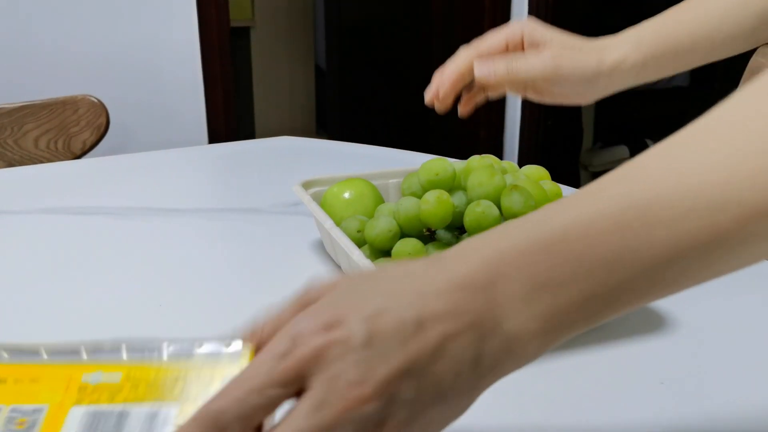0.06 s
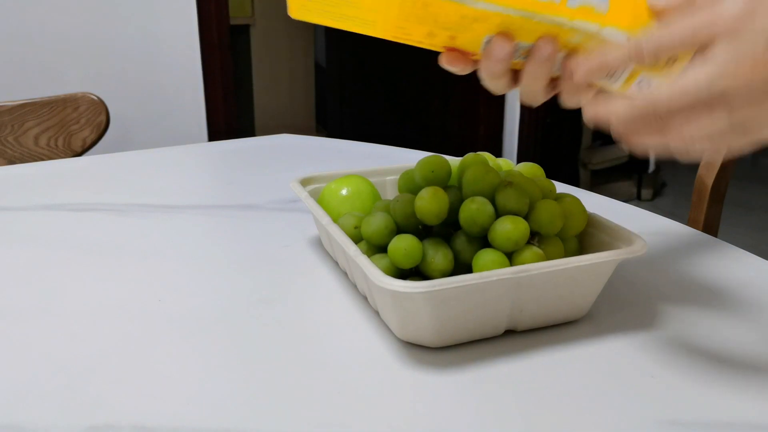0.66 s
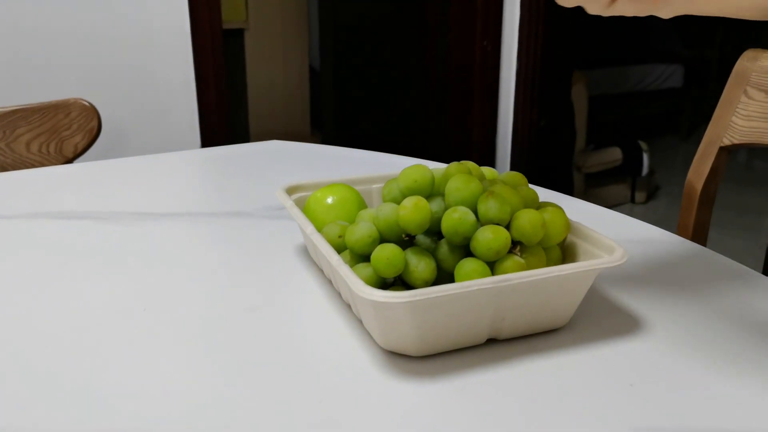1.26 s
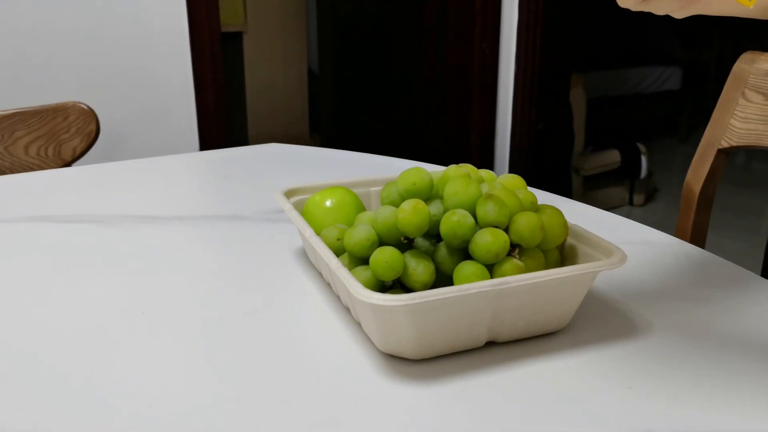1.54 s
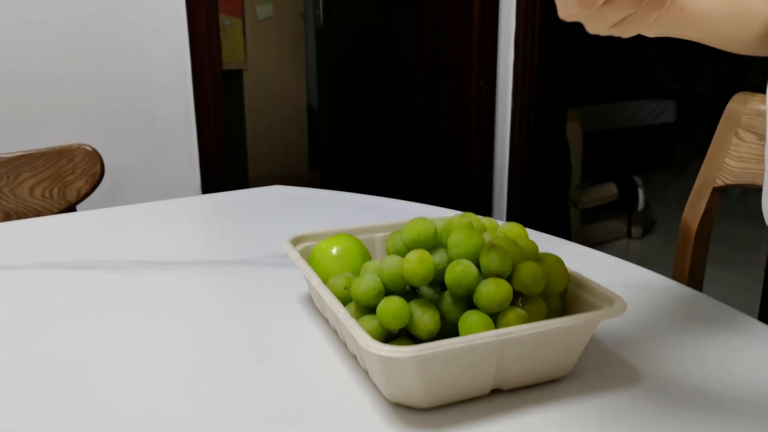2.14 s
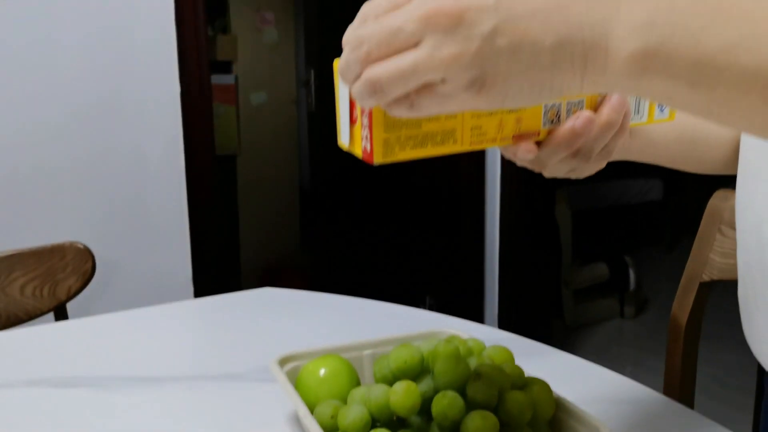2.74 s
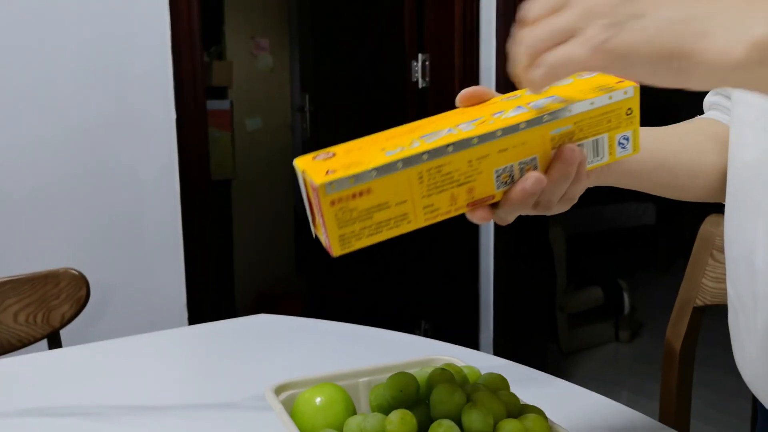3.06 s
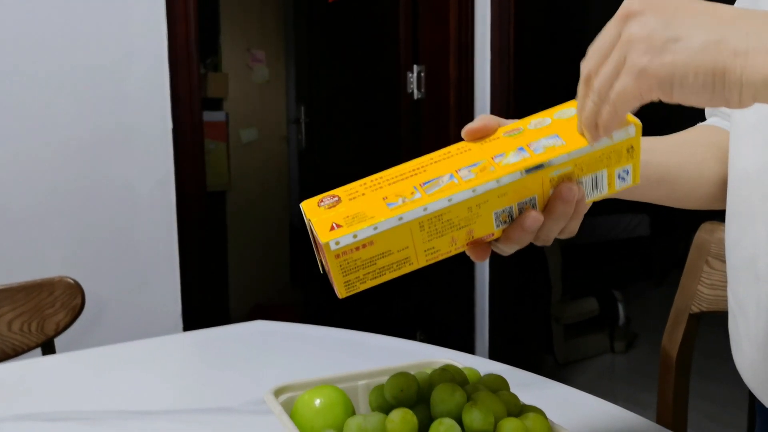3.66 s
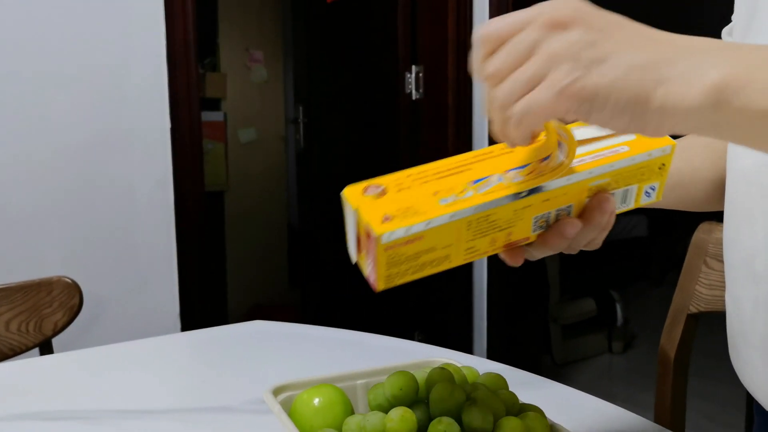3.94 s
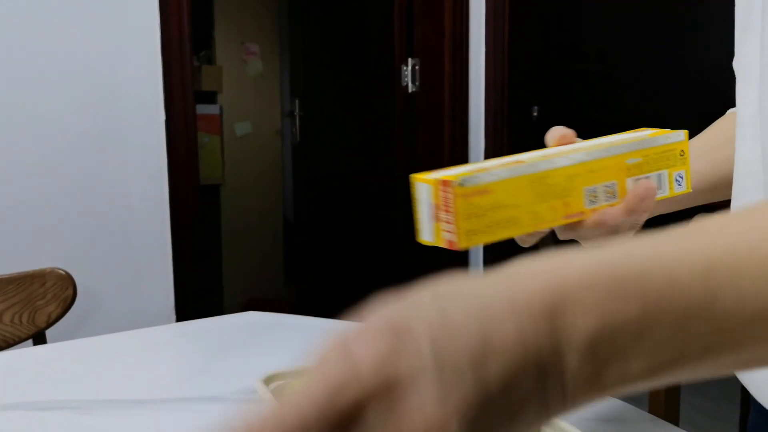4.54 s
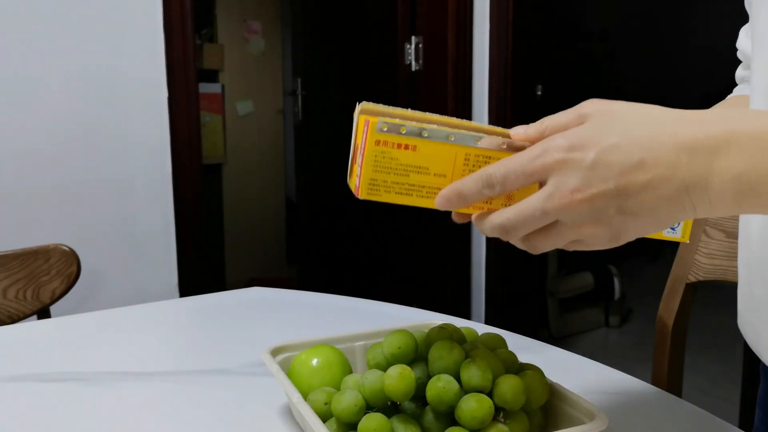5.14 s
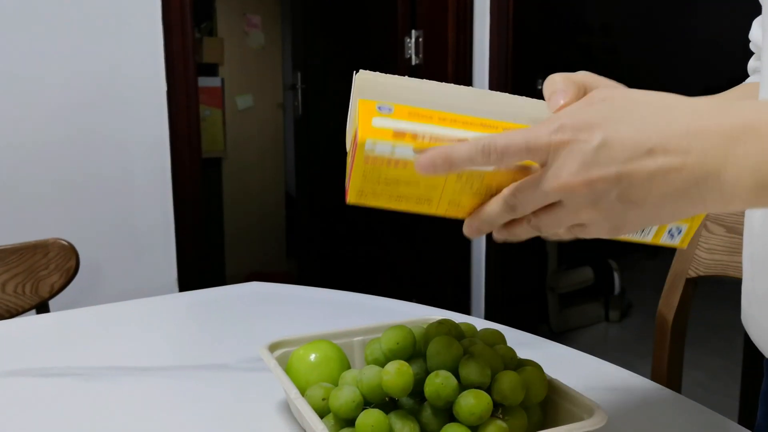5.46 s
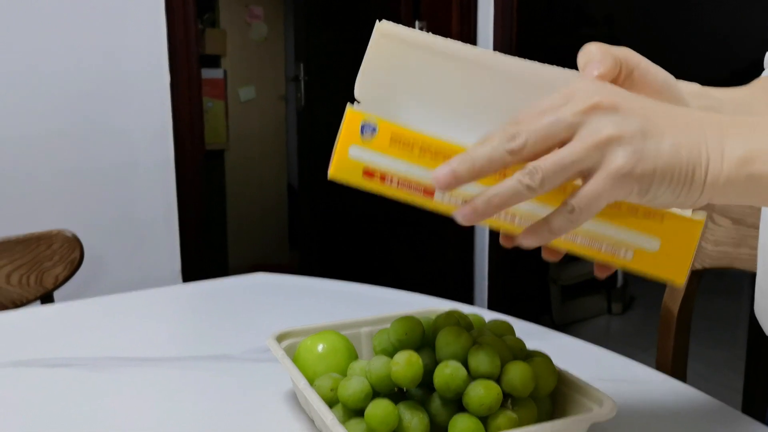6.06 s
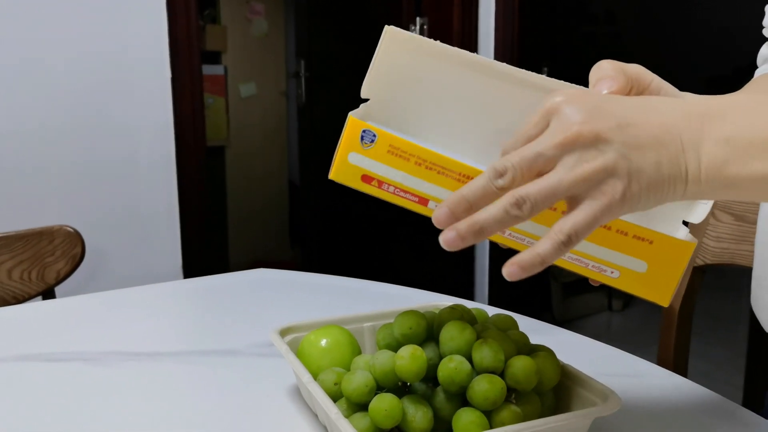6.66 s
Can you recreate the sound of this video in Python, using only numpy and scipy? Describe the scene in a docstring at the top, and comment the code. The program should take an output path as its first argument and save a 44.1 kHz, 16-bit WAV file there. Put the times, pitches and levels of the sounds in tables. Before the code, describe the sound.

A cardboard box of cling film knocks hollowly on a table as it is picked up. Fingers slide and scrape over the card with a faint squeak. After a lull and a few snaps, the perforated strip rips off in one long crackling pull and comes free with a thud. The lid bends open with snaps and scrapes, and the film crinkles lightly. It is all close to a phone in a small, faintly droning room.

```python
"""A carton of cling film is picked up and opened, close to a phone in a small, faintly droning room.
First it knocks on the table; then hands slide and scrape over the card and a finger sings along an edge.
From 3.6 s the perforated strip rips off in one long pull, ties snapping, and comes free with a thud.
The lid is bent open with more snaps and scrapes, and from 6.3 s the film inside crinkles.
Friction and blows ring briefly in the card; knocks, snaps and ticks also sound the box's hollow."""
import sys
import numpy as np
from scipy import signal
from scipy.fft import rfft, irfft
from scipy.io import wavfile
from scipy.ndimage import uniform_filter1d

SR = 44100
rng = np.random.default_rng(int(sys.argv[2]) if len(sys.argv) > 2 else 0)


def pcm_store(signal):
    """Save signal as 16-bit PCM."""
    levels = np.round(np.clip(np.atleast_2d(signal), -1, 1) * 32767)
    wavfile.write(sys.argv[1], SR, levels.astype(np.int16).T)


N = 299880
TIME = np.arange(N) / SR
PULL_S, FREE_S = 3.58, 4.46  # the strip goes taut, then comes free
SHUT, TAUT, LOOSE = range(3)  # states of the carton
BODY, LOW_MID, UPPER_MID, TREBLE = range(4)  # bands of the card
# likeness of the two microphone ports: (body [0-1], low-mid [0-1], upper-mid [0-1], treble [0-1])
PORT_LIKENESS = [0.93, 0.5, 0.1, .03]


def undb(db):
    """Decibels to gain."""
    return 10 ** (np.asarray(db) / 20)


def curves(table):
    """The columns of a table, joined by straight lines in time."""
    s, *columns = np.transpose(table)
    return [np.interp(TIME, s, c) for c in columns]


def add(out, s, x):
    """Mix a short sound in at time s."""
    i = max(int(s * SR), 0)
    out[:, i:i + x.shape[1]] += x[:, :max(N - i, 0)]


def response(points, lo_hz, hi_hz, size=2048):
    """Impulse response of unit energy: a curve of (frequency [Hz], gain [dB]) between two steep edges."""
    f = np.fft.rfftfreq(size, 1 / SR) + 1
    hz, db = np.transpose(points)
    edges = np.sqrt((1 + (lo_hz / f) ** 10) * (1 + (f / hi_hz) ** 10))
    gain = undb(np.interp(np.log(f), np.log(hz), db)) / edges
    cepstrum = irfft(np.log(gain + 1e-5))
    cepstrum[1:size // 2] *= 2  # fold to minimum phase: no ringing before the hit
    cepstrum[size // 2 + 1:] = 0
    h = irfft(np.exp(rfft(cepstrum)))
    return h / np.linalg.norm(h)


def ring(x, h):
    """Pass a stereo pair through a response."""
    return signal.oaconvolve(x, np.atleast_2d(h), axes=1)[:, :x.shape[1]]


def stereo_noise(n, likeness):
    """Stereo noise whose middle has rms 1."""
    c = np.clip(likeness, 0, .995)
    mid, side = rng.standard_normal((2, n))
    return mid + np.sqrt((1 - c) / (1 + c)) * side * np.array([[1], [-1]])


def decay(t, t60_s):
    """Envelope that falls 60 dB in t60_s."""
    return np.exp(-np.log(1000) * t / t60_s)


def pitched(x, hz, q, share):
    """One resonance stands out of the sound; its energy stays the same."""
    y = x + share * signal.lfilter(*signal.iirpeak(hz, q, fs=SR), x)
    return y * np.linalg.norm(x) / np.linalg.norm(y)


def whistle(hz, half_width_hz, likeness):
    """A narrow noise band follows a pitch curve; likeness sets the stereo image of its two phases."""
    narrow = signal.butter(2, half_width_hz, fs=SR, output="sos")
    noise = stereo_noise(len(hz), likeness[0]) + 1j * stereo_noise(len(hz), likeness[1])
    tone = np.real(signal.sosfilt(narrow, noise) * np.exp(2j * np.pi * np.cumsum(hz) / SR))
    return tone / tone.mean(0).std()


def grains(rate, spread_db, length_s, smooth):
    """Envelope of rms 1: tiny fractures at random times and sizes over a share of even friction."""
    chance, size = rng.random(N), np.clip(rng.standard_normal(N), -2, 2)
    t = np.arange(SR // 50) / SR
    fractures = (chance < rate / SR) * undb(spread_db * size) ** 2
    power = signal.oaconvolve(fractures, t * np.exp(-2 * t / length_s))[:N]
    power = np.abs(power) / power.mean() + smooth
    # a steady pull releases about the same energy in every stretch
    return np.sqrt(power / uniform_filter1d(power, size=2600))


def jerks(rate, depth_db):
    """Uneven motion: a gain that wanders about `rate` times a second."""
    knots = np.clip(rng.standard_normal(4096), -2, 2)
    gain = undb(depth_db * np.interp(TIME * rate, np.arange(len(knots)), knots))
    return gain / np.sqrt(uniform_filter1d(gain ** 2, size=3000))


def swell(s, half_s):
    """Start time and bell-shaped force of a contact centred on s."""
    start = max(s - 3 * half_s, 0)
    t = start + np.arange(SR // 3) / SR
    return start, np.exp(-.38 * ((t - s) / half_s) ** 2)


def card_responses():
    """The card's resonances shift as the carton opens: one response for each state and band."""
    # the card's tone as the phone hears it, with the microphone's peaks near 3.4 and 10 kHz:
    # (frequency [Hz], gain [dB])
    tone_at_phone = [(60, -5.5), (130, -11.5), (450, -7.5), (760, -12), (1450, 3.5), (2300, -3),
                     (3350, 6.5), (4400, 1), (5500, -15), (7000, -8), (8600, -6.5), (10400, 6.5),
                     (13800, -13), (16000, -22.5)]
    # resonances with the carton shut, strip taut and lid loose: (pitch [Hz], width [Hz], gain [dB])
    shut = [(366, 36, 8.5), (550, 74, 0.5), (1127, 390, 10.5), (1396, 220, -5), (1980, 580, 5),
            (2720, 330, 5), (2860, 110, -7), (3570, 185, 1), (6330, 5900, -9.5), (11500, 3300, -1)]
    taut = [(424, 250, 4), (1167, 110, 8), (1677, 69, 2.5), (1980, 340, 2.5), (2780, 44, 5),
            (3040, 300, -5.5), (3270, 28, 2.5), (4040, 300, -6.5), (11000, 1800, -1), (14200, 2500, 13.5)]
    loose = [(295, 274, 1), (452, 51, 1.5), (895, 280, 0), (1266, 180, -1.5), (1760, 61, 5.5),
             (2270, 230, 7), (2620, 330, 2), (3185, 250, -5.5), (3640, 88, 3.5), (14600, 4000, 10)]
    # body, low-mid, upper-mid and treble: (low edge [Hz], high edge [Hz])
    bands = [(90, 800), (800, 2200), (2200, 5500), (5500, 16500)]
    f = np.geomspace(40, 17000, 700)
    hz, db = np.transpose(tone_at_phone)
    base_db = np.interp(np.log(f), np.log(hz), db)
    states = []
    for resonances in (shut, taut, loose):
        peaks_db = sum(gain / (1 + (2 * (f - pitch) / width) ** 2) for pitch, width, gain in resonances)
        states.append([response(np.column_stack([f, base_db + peaks_db]), lo, hi) for lo, hi in bands])
    return states


CARD_RESPONSES = card_responses()


def state_at(s):
    """State of the carton at time s: shut, strip taut or lid loose."""
    return np.searchsorted([PULL_S, FREE_S], s)


def card(force, band, state):
    """A rough force of the given envelope shakes the card in one band."""
    return ring(force * stereo_noise(len(force), PORT_LIKENESS[band]), CARD_RESPONSES[state][band])


def blow(s, bands_db, hold_s, decays_s, hollow_db):
    """The card buckles and dies away while the hollow box rings on: one stereo burst per band."""
    # modes of the hollow box: (pitch [Hz], level [dB], t60 [s])
    modes = [(366, -10, 0.22), (407, -32.5, 0.18), (582.7, 1.5, 0.15), (1045, 9, 0.039)]
    buckle_s = .0008
    t, bursts = np.arange(SR // 6) / SR, []
    for band, db in enumerate(bands_db):
        force = np.minimum(t / buckle_s, 1) * np.exp(-np.maximum(t - hold_s, 0) / decays_s[band])
        burst = card(force, band, state_at(s))
        bursts.append(burst * undb(db) * np.linalg.norm(force) / np.linalg.norm(burst.mean(0)))
    detunes = 1 + 0.024 * rng.standard_normal(len(modes))
    hollow = sum(undb(db) * np.sin(2 * np.pi * hz * detune * t) * decay(t, t60)
                 for (hz, db, t60), detune in zip(modes, detunes))
    bursts[BODY] += hollow * undb(bands_db[BODY] + hollow_db)
    return bursts


def background():
    """A bed of still air, a wavering rumble and a low drone near 100 Hz."""
    # colour of the room's air: (frequency [Hz], gain [dB])
    air_tone = [(12, -41), (20, -27), (107, -8.5), (293, -21), (410, -14), (472, -16), (624, -16.5),
                (780, -21.5), (1330, -34.5), (4810, -42.5), (5680, -49.5), (8410, -47.5), (16000, -46.5)]
    # level of the low drone, wandering slowly: (time [s], relative level [dB])
    low_levels = [(0.0, -66.5), (0.45, -61), (0.92, -69.5), (1.73, -64), (2.89, -73), (3.85, -71),
                  (4.19, -65), (4.72, -71), (6.43, -64.5), (6.75, -69.5)]
    # wavering of the rumble beneath it: (time [s], level [dB])
    rumble_levels = [(0.0, -59), (0.75, -59.5), (0.85, -65.5), (1.8, -52), (2.14, -59.5), (2.46, -49.5),
                     (2.71, -75.5), (2.93, -60), (3.12, -67), (3.83, -65), (4.21, -52), (5.53, -59),
                     (5.73, -50.5), (6.75, -56.5)]
    rumble_tone = [(15, -3.0), (27, -1.5), (40, -9.5), (70, -17)]
    low_tone = [(50, -9.5), (80, -10.5), (101, 11), (125, -5), (250, -8.5), (600, -31.0)]
    air = ring(stereo_noise(N, 0.33), response(air_tone, 1000, 16500)) * undb(-11.5)
    air += ring(stereo_noise(N, 0.62), response(air_tone, 108, 850)) * undb(-7.0)
    rumble = ring(stereo_noise(N, 0.91), response(rumble_tone, 14, 80, size=16384))
    low_bed = ring(stereo_noise(N, 0.63), response(low_tone, 39, 890, size=8192))
    (rumble_db,), (low_db,) = curves(rumble_levels), curves(low_levels)
    return air * undb(-61.5) + rumble * undb(rumble_db) + low_bed * undb(low_db + 4.5)


def rustling():
    """The card rustles in fine slips: each rustle swells, holds and fades."""
    # soft rustles of card, from hand strokes and the brief tails after snaps and the rip:
    # (start [s], length [s], level [dB], low-mid offset [dB], treble offset [dB])
    rustles = [(0.0, 0.054, -52.5, -6, 4.5), (0.052, 0.084, -59, -16, 5.5), (0.467, 0.077, -56, -16, 2),
               (0.517, 0.11, -51.5, -6, 3), (0.659, 0.071, -61, -14, 2), (0.811, 0.057, -52.5, -9, 1.5),
               (0.931, 0.098, -62, -15, -16), (1.051, 0.029, -54.5, -12, -6),
               (1.151, 0.068, -49.5, -14, 1.5), (1.215, 0.092, -68, -15, -3), (1.37, 0.14, -62.5, -23, 8.5),
               (1.484, 0.11, -72, -16, 7.5), (1.667, 0.25, -68, -16, 1.5), (2.229, .08, -78.5, -7, 2),
               (3.211, 0.039, -63, -6, -1), (3.34, 0.023, -61.5, -10, 1), (3.504, 0.049, -60.5, -9, 8),
               (4.418, 0.093, -45.5, -3.5, -7), (4.467, 0.18, -50.5, -8.5, -1),
               (4.676, 0.051, -49, -9, -0.5), (4.715, 0.096, -57, -7, 10.5), (4.857, 0.048, -63, -10, -5),
               (5.004, 0.037, -46, -5.5, -13), (5.118, 0.072, -50.5, -2, -1),
               (5.254, 0.075, -56.5, -10, -1.5), (5.463, 0.031, -69, 0.5, 1), (5.524, 0.19, -68.5, -10, 2),
               (5.69, 0.12, -59.5, -6.5, 3), (5.929, 0.082, -57, 2.5, -1), (6.111, 0.057, -52.5, -14, -2),
               (6.255, 0.076, -50, -11, 2), (6.438, 0.075, -57, -7, 3), (6.54, 0.21, -63, -11, -15)]
    rise_share, fade_s = 0.51, 0.03
    power, t = np.zeros((3, N)), np.arange(SR // 2) / SR
    for s, length_s, level_db, low_db, treble_db in rustles:
        rise = np.minimum(t / (rise_share * length_s), 1)
        fade = np.exp(-np.maximum(t - length_s, 0) / fade_s)
        gains = undb(level_db + np.array([low_db, 0, treble_db]))
        add(power, s, np.outer(gains, rise * fade) ** 2)
    forces = grains(rate=320, spread_db=3.5, length_s=0.0023, smooth=1.0) * np.sqrt(power)
    opened = TIME > FREE_S
    return sum(card(force * ~opened, band, SHUT) + card(force * opened, band, LOOSE)
               for band, force in enumerate(forces, LOW_MID))


def scraping():
    """Fingers and flaps stick and slip in short swells, each squeaking at its own pitch."""
    # scrapes: (centre [s], half length [s], level [dB], low-mid offset [dB], treble offset [dB],
    # squeak [Hz])
    scrapes = [(0.04, 0.0033, -48, -6, 6, 3800), (0.78, 0.0062, -54, -6, 2.5, 2660),
               (1.196, 0.0079, -36, -15, -1.5, 2890), (1.311, 0.0062, -36.5, -8.5, -12, 3340),
               (1.342, 0.011, -41.5, -13, -4, 3420), (1.359, 0.0034, -33.5, -9.5, -5, 3460),
               (4.914, 0.0024, -47.5, -30, 2.5, 4490), (4.944, 0.0056, -38.5, -39, 2, 3780),
               (5.525, 0.0056, -39.5, -2.5, -7, 4170), (5.692, 0.0026, -45.5, -0.5, -8.5, 1360),
               (5.882, 0.018, -47, -10.5, -13, 3130), (6.012, 0.011, -34.5, -5.5, -7.5, 2340),
               (6.201, 0.0077, -38, -6, -1.5, 3220), (6.276, 0.0064, -41, 5, -13, 3200)]
    out = np.zeros((2, N))
    slips = grains(rate=2000, spread_db=2.5, length_s=0.00016, smooth=0.31)
    for s, half_s, level_db, low_db, treble_db, hz in scrapes:
        start, force = swell(s, half_s)
        force = force * np.roll(slips, -int(start * SR))[:len(force)] * undb(level_db)
        rasp = card(force * undb(low_db), LOW_MID, state_at(s)) + card(force, UPPER_MID, state_at(s))
        hiss = card(force * undb(treble_db), TREBLE, state_at(s))
        add(out, start, pitched(rasp, hz, q=11.3, share=3.2) + hiss)
    return out


def bumping():
    """Soft contacts of the hands and the roll move only the body of the box."""
    # dull bumps: (centre [s], half length [s], level [dB], pitch of the touched panel [Hz])
    bumps = [(0.04, 0.041, -54, 1070), (0.317, 0.0097, -43.5, 520), (0.538, 0.014, -61, 480),
             (0.616, 0.03, -51, 370), (0.713, 0.005, -48.5, 860), (0.873, 0.011, -58, 380),
             (1.483, 0.0088, -50.5, 332), (3.296, 0.0033, -58.5, 227), (3.635, 0.012, -53.5, 385),
             (4.392, 0.009, -32.5, 190), (4.475, 0.05, -47, 550), (4.673, 0.012, -49, 565),
             (5.127, 0.021, -48.5, 220), (5.194, 0.015, -56.5, 368), (5.864, 0.0069, -64, 210),
             (5.924, 0.028, -66, 446), (6.117, 0.041, -61.5, 182), (6.256, 0.03, -55, 1030),
             (6.331, 0.011, -50.5, 1140)]
    out = np.zeros((2, N))
    for s, half_s, db, hz in bumps:
        start, force = swell(s, half_s)
        add(out, start, pitched(card(force * undb(db), BODY, state_at(s)), hz, q=2.3, share=2.4))
    return out


def knocking():
    """Table and knuckles strike the whole box; the lows die last."""
    # knocks and their band offsets:
    # (time [s], level [dB], body [dB], low-mid [dB], upper-mid [dB], treble [dB])
    knocks = [(0.114, -22, -10.5, -13, -14, -37), (0.2848, -18.5, -7.5, -18, -6, -16.5),
              (4.663, -28.5, -4.5, -12, -12, -8.5), (4.676, -22, -8.5, -22, -20, -34),
              (5.261, -22, -21.5, -14, -17, -30), (5.32, -27, -14.5, -7, -26, -36),
              (6.33, -28, -27, -6.5, -11.5, -17)]
    out = np.zeros((2, N))
    for s, level_db, *offsets_db in knocks:
        bursts = blow(s, level_db + np.array(offsets_db), hold_s=0.0024,
                      decays_s=[0.006, 0.002, 0.0032, 0.00066], hollow_db=-11)
        add(out, s, sum(bursts))
    return out


def thudding():
    """A hard blow or sudden release rings the whole carton at one low pitch."""
    # the table hit, a tap, the strip coming free and dropping: (time [s], pitch [Hz], level [dB], t60 [s])
    thuds = [(0.287, 428, -25, 0.056), (2.898, 490, -43, 0.063), (4.386, 160, -25, 0.055),
             (4.435, 209, -33.5, 0.015), (4.665, 175, -39, 0.067)]
    out, t = np.zeros((2, N)), np.arange(SR // 6) / SR
    for s, hz, db, t60 in thuds:
        add(out, s, np.ones((2, 1)) * undb(db) * np.sin(2 * np.pi * hz * t) * decay(t, t60))
    return out


def snapping():
    """A patch of card gives way and rings at its own pitch; a sharper break sounds brighter."""
    # card buckling or ties breaking: (time [s], level [dB], treble tilt [dB], patch pitch [Hz])
    snaps = [(0.476, -48, 5, 2600), (2.896, -24, 3, 4000), (3.186, -24, 0, 3060), (3.613, -30, 12.5, 3360),
             (3.637, -29.5, 1, 1940), (3.709, -31.5, 6, 3240), (3.754, -13, 8.5, 1620),
             (3.76, -16, 3.5, 3450), (3.833, -38, 7, 3400), (3.934, -20, 12, 1670), (4.085, -20, -7, 3350),
             (4.254, -17.5, 11.5, 3400), (4.377, -23.5, -11, 3380), (4.382, -26, -3, 3810),
             (4.431, -20, -6, 3800), (4.635, -37, 4, 3880), (5.01, -17, 4, 4240), (5.02, -22, -0.5, 2120),
             (5.082, -34.5, 0, 1770), (5.112, -31, 4, 3000), (5.52, -36, 3.5, 3920), (5.568, -36, -4, 1680),
             (5.597, -45, -11, 1760), (6.216, -25.5, 0.5, 1840), (6.319, -39, -7, 1450),
             (6.353, -36.5, -1, 3500), (6.484, -34.5, 3.5, 2270), (6.675, -39.5, 3, 3530),
             (6.718, -32, 5.5, 3830)]
    # colour of every snap: (body [dB], low-mid [dB], upper-mid [dB], treble [dB])
    colour_db = [-27, -8.5, -3.5, -7.5]
    out, tilt = np.zeros((2, N)), np.array([-1, -1, 0, 1])
    for s, level_db, tilt_db, hz in snaps:
        bands_db = level_db + np.array(colour_db) + tilt_db * tilt
        body, low, upper, treble = blow(s, bands_db, hold_s=0.00047,
                                        decays_s=[0.0021, 0.004, 0.0022, 0.0016], hollow_db=-6)
        patch = pitched(low + upper, hz, q=6, share=1.6)
        add(out, s + 0.001314, body + patch + treble)
    return out


def edge_singing():
    """Friction feeds one narrow resonance, whose pitch drifts as the finger travels."""
    # a finger running along the carton's edge: (time [s], pitch [Hz], level [dB])
    edge_rub = [(0.9, 3450, -85), (1.1, 3476, -58), (1.25, 3430, -65), (1.45, 3530, -53.5),
                (1.62, 3450, -78), (1.78, 3565, -67.5), (1.95, 3410, -63), (2.08, 3280, -67),
                (2.2, 3270, -81)]
    hz, level_db = curves(edge_rub)
    return whistle(hz, half_width_hz=250, likeness=(0.6, 0.37)) * undb(level_db)


def swishing():
    """Long dry strokes whistle faintly: a band of friction noise swells and rises with the hand's speed."""
    # swishes: (start [s], length [s], level [dB], first pitch [Hz])
    swishes = [(1.198, 0.33, -46.5, 9920), (1.695, 0.27, -63, 10370)]
    rise_hz_per_s = 5500
    out, t = np.zeros((2, N)), np.arange(SR // 2) / SR
    for s, length_s, level_db, hz in swishes:
        tone = whistle(hz + rise_hz_per_s * t, half_width_hz=950, likeness=[PORT_LIKENESS[TREBLE]] * 2)
        add(out, s, tone * undb(level_db) * np.sin(np.pi * np.minimum(t / length_s, 1)))
    return out


def ticking():
    """Tiny sharp contacts hardly move the box and sound mostly in the treble."""
    # thin ticks of fingernails, fibres and film: (time [s], level [dB])
    ticks = [(1.291, -30), (1.694, -45.5), (2.246, -52), (2.414, -42.5), (3.486, -41), (3.989, -10.5),
             (4.009, -15), (4.351, -16), (4.392, -12.5), (4.431, -9.5), (4.558, -33), (5.757, -47),
             (6.295, -25.5), (6.379, -35.5), (6.422, -34.5), (6.569, -38), (6.608, -26), (6.623, -28.5),
             (6.706, -51), (6.74, -44)]
    # colour of every tick: (body [dB], low-mid [dB], upper-mid [dB], treble [dB])
    colour_db = [-42.5, -45.5, -17, -5]
    out = np.zeros((2, N))
    for s, level_db in ticks:
        bursts = blow(s, level_db + np.array(colour_db), hold_s=0.0013,
                      decays_s=[0.002, 0.003, 0.002, 0.0012], hollow_db=-2.5)
        add(out, s + 0.0019, sum(bursts))
    return out


def tearing():
    """The strip lurches along: the perforation's ties break in turn, with finer fibres ripping between."""
    # a first tug, the long rip and a last yank:
    # (start [s], length [s], level [dB], attack [s], sag [dB/s], treble offset [dB])
    pulls = [(3.599, 0.22, -38.5, 0.0083, 90, 2.5), (3.756, 0.66, -28.5, 0.18, 0.5, 2.5),
             (4.342, 0.062, -31.5, .02, -0.5, 7.5)]
    let_go_s, middle_s, middle_half_s = 0.011, 3.98, 0.1
    near_end_hz, far_end_hz, shift_s = 1660, 3760, 0.2
    pull, bright = np.zeros((2, N))
    for s, length_s, level_db, attack_s, sag_db_per_s, treble_db in pulls:
        t = np.maximum(TIME - s, 0)
        effort = np.minimum(t / attack_s, 1) ** 0.56 * np.exp(-np.maximum(t - length_s, 0) / let_go_s)
        effort *= undb(level_db - sag_db_per_s * np.minimum(t, length_s))
        pull = np.hypot(pull, effort)
        bright = np.hypot(bright, effort * undb(treble_db))
    # the broad panel sounds most while the tear passes its middle
    middle = np.exp(-.5 * ((TIME - middle_s) / middle_half_s) ** 2)
    hand = jerks(rate=170, depth_db=1.8) * jerks(rate=45, depth_db=1.1)
    ties = grains(rate=150, spread_db=2.5, length_s=.0009, smooth=1.5)
    fibres = jerks(rate=260, depth_db=3.5)
    forces = [pull * undb(-18.5 + 2.95 * middle), pull * undb(-9.5 + 4.4 * middle),
              pull * undb(-2.0), bright * fibres * undb(-2.5 + 1.9 * middle)]
    body, low, upper, treble = (card(hand * ties * force, band, TAUT) for band, force in enumerate(forces))
    # past the middle, the card's low ring crossfades into a high one
    along = np.clip((TIME - middle_s) / shift_s, 0, 1)
    near = pitched((low + upper) * (1 - along), near_end_hz, q=6, share=0.56)
    far = pitched((low + upper) * along, far_end_hz, q=6.4, share=0.38)
    return body + near + far + treble


def crinkling():
    """Small creases of the bared film pop at random under the fingers, high in the treble."""
    start_s, ease_until_s, level_db = 6.27, 6.65, -51
    pops = grains(rate=55, spread_db=1, length_s=0.0004, smooth=.01)
    touch = np.interp(TIME, [start_s - .02, start_s, ease_until_s], [0, 1, .35])
    film = response([(5500, -24), (9000, -13), (11000, 17), (13500, -2), (16000, -7)], 6000, 16500)
    return ring(pops * touch * undb(level_db) * stereo_noise(N, PORT_LIKENESS[TREBLE]), film)


def room(x, wet_db, low_t60_s, high_t60_s, wall_s, wall_db):
    """A small hard room: a diffuse tail, and a cluster of echoes off the far wall."""
    t = np.arange(SR // 2) / SR
    lowpass, highpass = (signal.butter(2, 1300, kind, fs=SR, output="sos") for kind in ("low", "high"))
    lows = signal.sosfilt(lowpass, stereo_noise(len(t), 0.39)) * decay(t, low_t60_s)
    highs = signal.sosfilt(highpass, stereo_noise(len(t), 0)) * decay(t, high_t60_s)
    far_wall = undb(wall_db) * np.exp(-((t - wall_s) / 0.021) ** 2)
    arrival = np.clip((t - .002) / 0.0056, 0, 1) * (1 + far_wall)
    tail = (1.55 * lows + highs) * arrival
    return x + undb(wet_db) * ring(x, tail / np.linalg.norm((highs * arrival)[0]))


def microphone_ports(x):
    """The right port resonates near 3.5 and 10 kHz, the left near 9 kHz, panning each frequency."""
    # balance of the ports: (frequency [Hz], left minus right [dB])
    balance = [(1400, 0.5), (2800, -2.5), (3350, -14.5), (3700, -12.5), (4400, -4.5), (5900, 0),
               (7800, -1.5), (8800, 9), (9350, -1.5), (10200, -38.5), (11600, -13.5), (15500, -12)]
    hz, db = np.transpose(balance)
    gains = undb(np.array([[.5], [-.5]]) * np.interp(np.fft.rfftfreq(N, 1 / SR), hz, db))
    return irfft(rfft(x) * gains / np.sqrt(np.mean(gains ** 2, axis=0)), N)


def scene():
    """Everything the carton does, heard in the room over its low bed."""
    rubbing = rustling() + edge_singing() + swishing() + scraping()
    carton = rubbing + tearing() + bumping() + thudding() + knocking() + snapping() + ticking()
    carton += crinkling()
    in_room = room(carton, wet_db=-9.5, low_t60_s=0.33, high_t60_s=0.3, wall_s=0.027, wall_db=-15.0)
    return microphone_ports(in_room) + background()


def record(dry):
    """The phone rounds the loudest peaks and cuts the top above 15.5 kHz."""
    top_cut = signal.ellip(8, .2, 70, 15500, fs=SR, output="sos")
    return signal.sosfilt(top_cut, 2 * np.tanh(dry / 2))


dry = scene()
out = record(dry)
pcm_store(out)
```